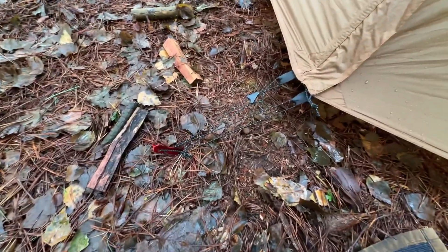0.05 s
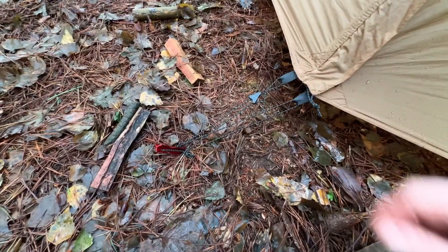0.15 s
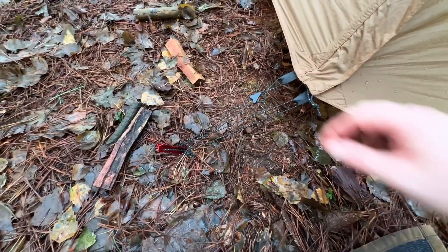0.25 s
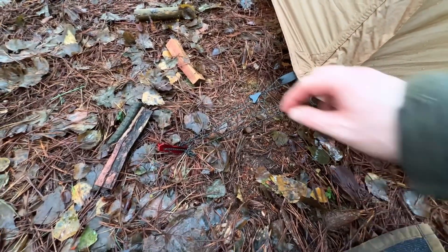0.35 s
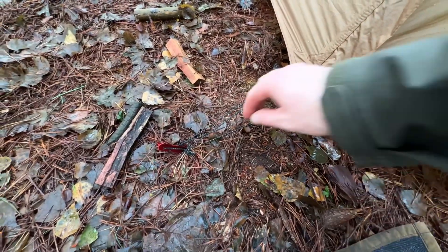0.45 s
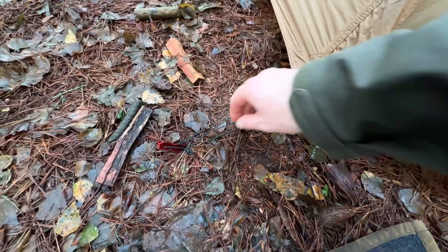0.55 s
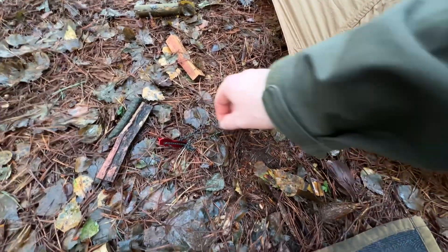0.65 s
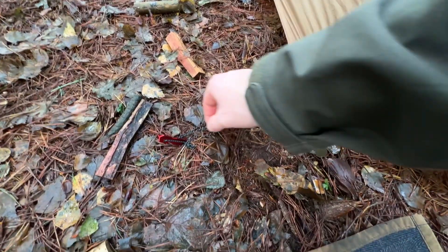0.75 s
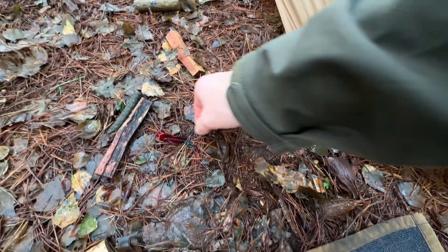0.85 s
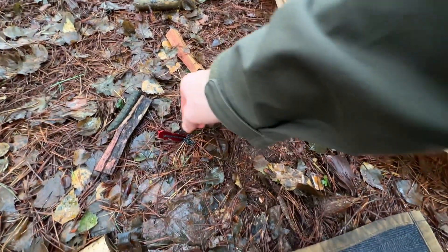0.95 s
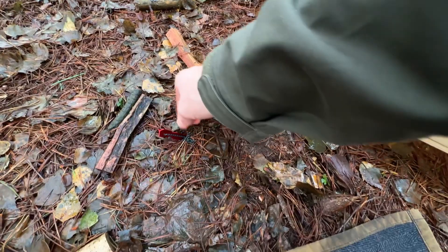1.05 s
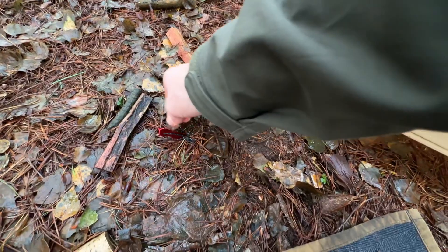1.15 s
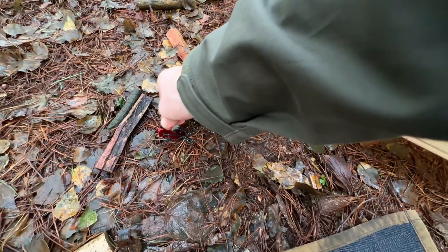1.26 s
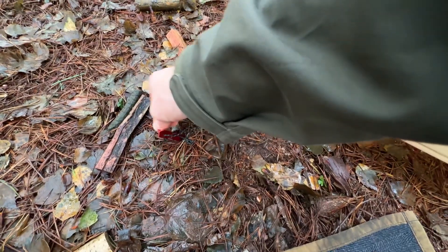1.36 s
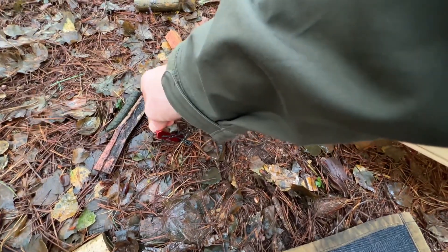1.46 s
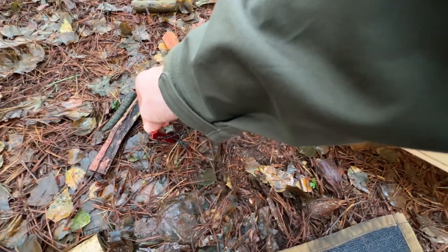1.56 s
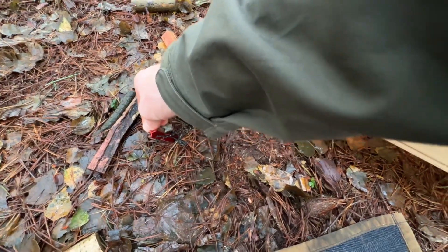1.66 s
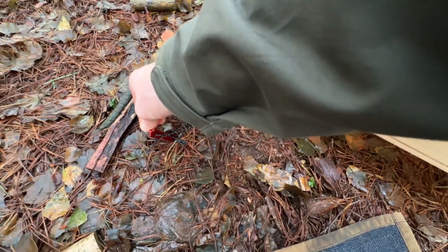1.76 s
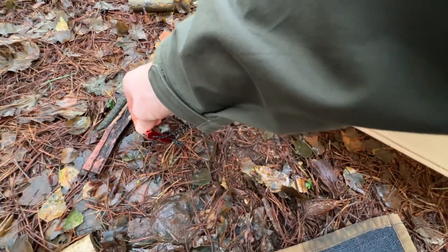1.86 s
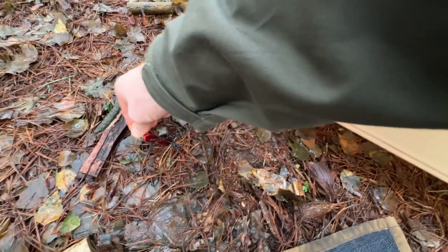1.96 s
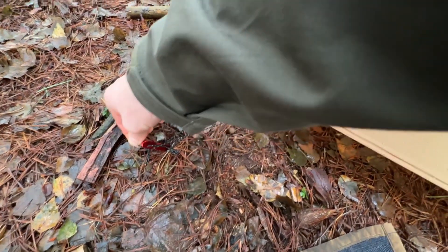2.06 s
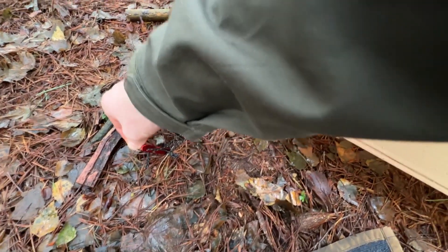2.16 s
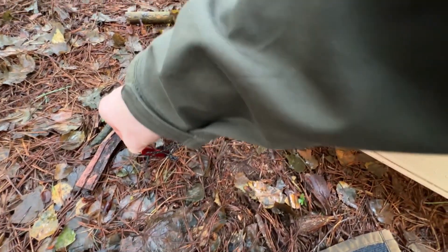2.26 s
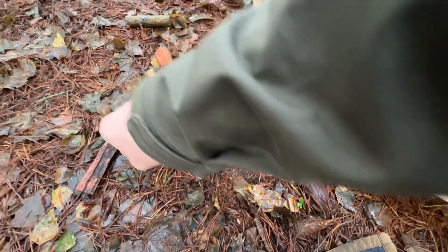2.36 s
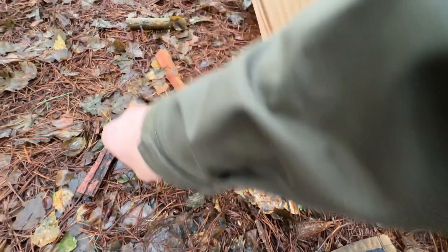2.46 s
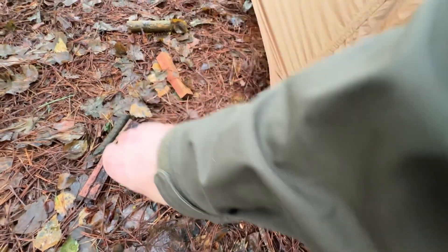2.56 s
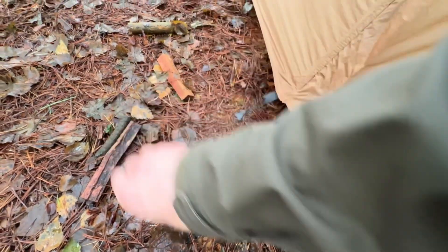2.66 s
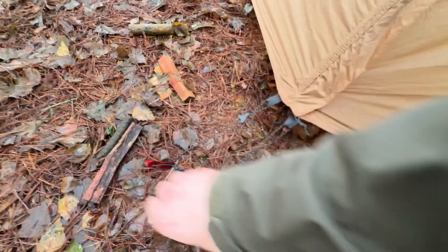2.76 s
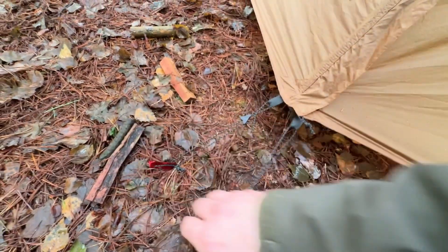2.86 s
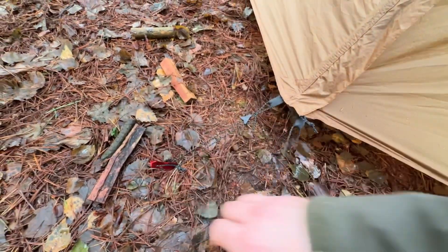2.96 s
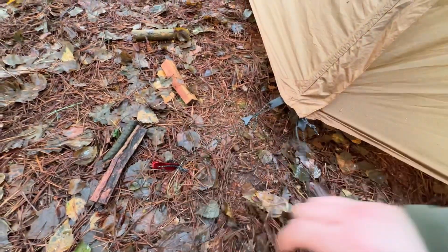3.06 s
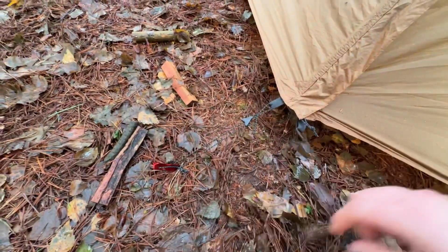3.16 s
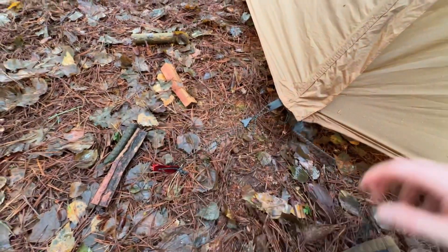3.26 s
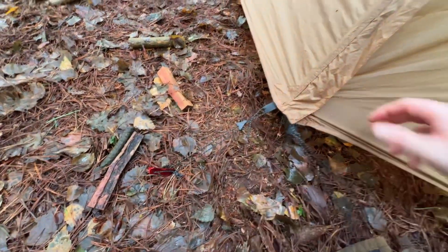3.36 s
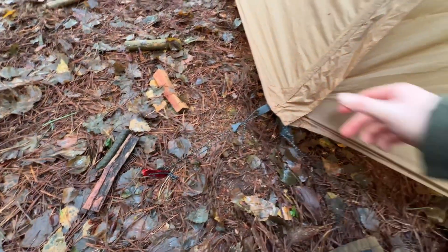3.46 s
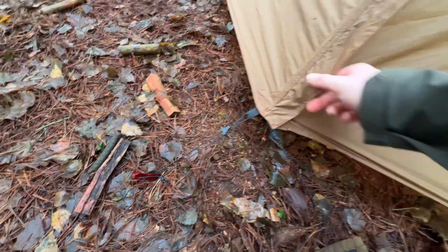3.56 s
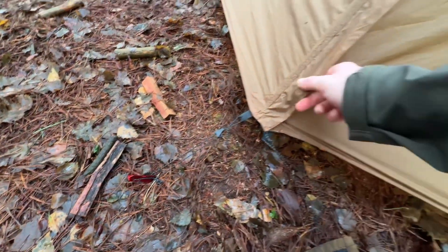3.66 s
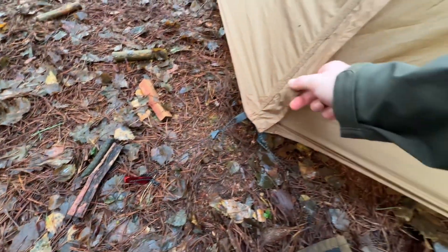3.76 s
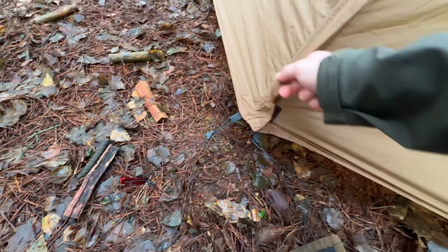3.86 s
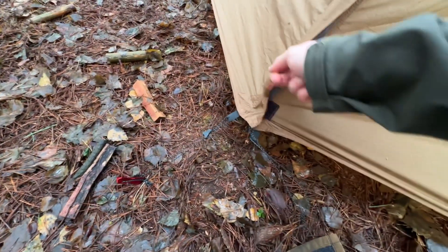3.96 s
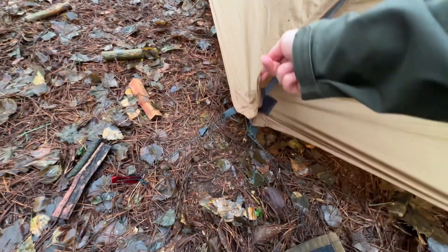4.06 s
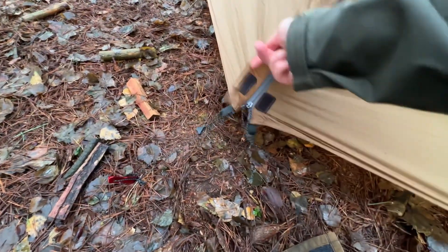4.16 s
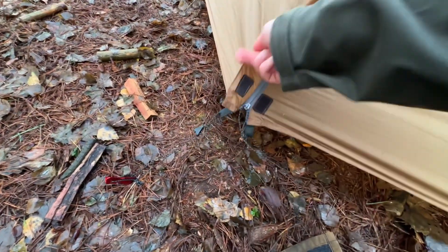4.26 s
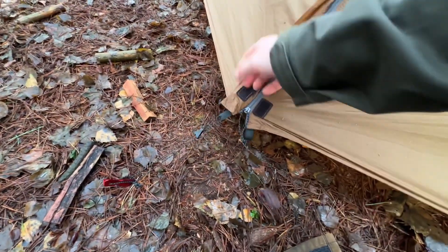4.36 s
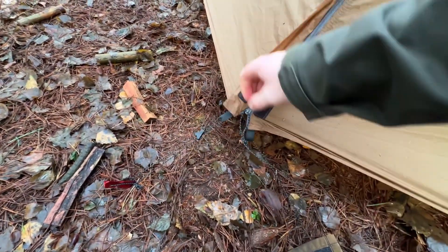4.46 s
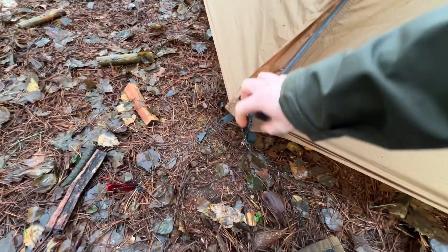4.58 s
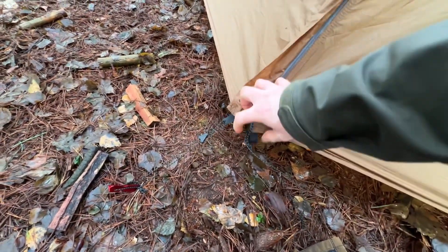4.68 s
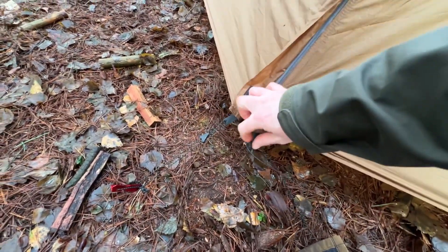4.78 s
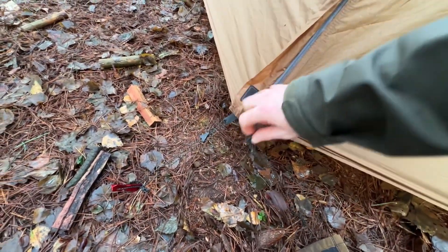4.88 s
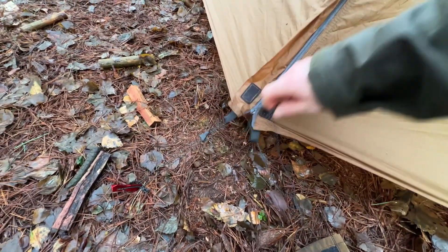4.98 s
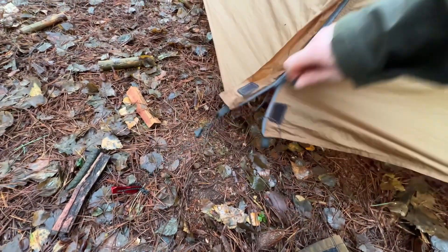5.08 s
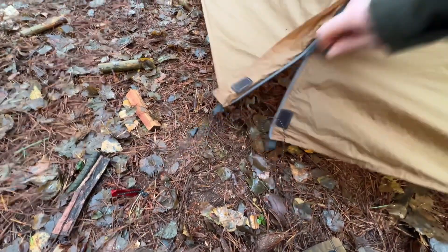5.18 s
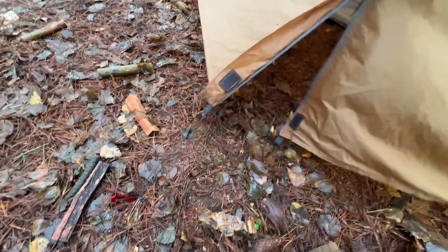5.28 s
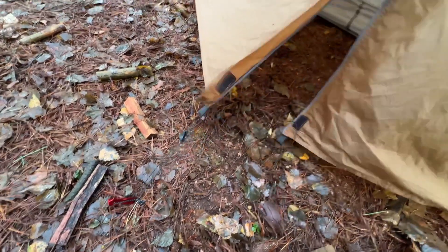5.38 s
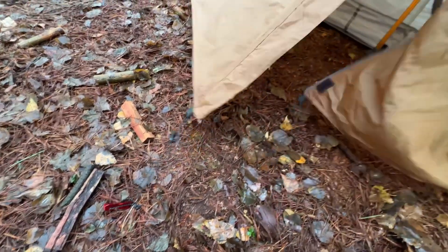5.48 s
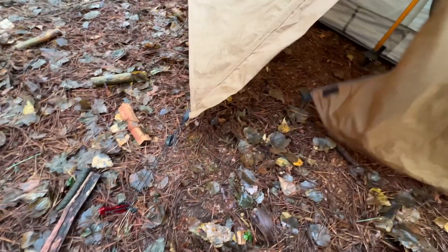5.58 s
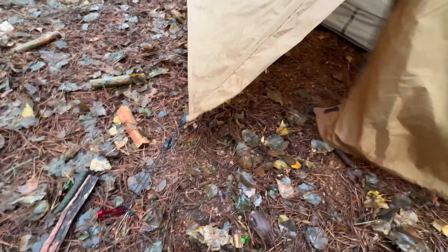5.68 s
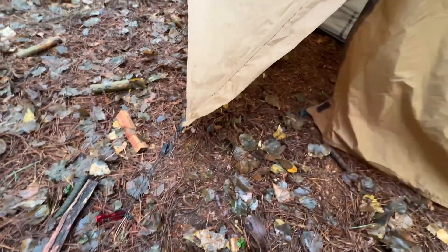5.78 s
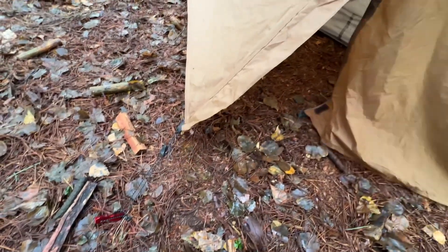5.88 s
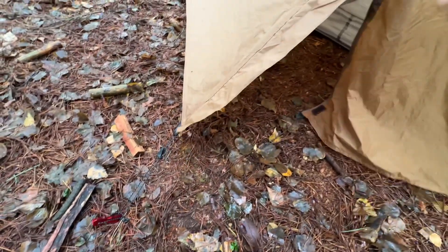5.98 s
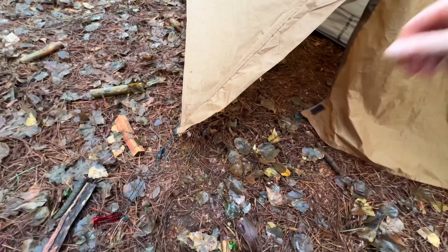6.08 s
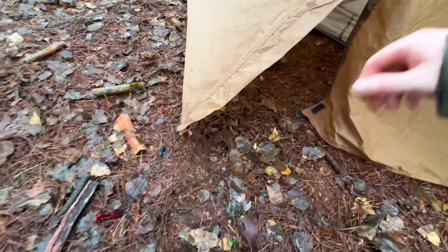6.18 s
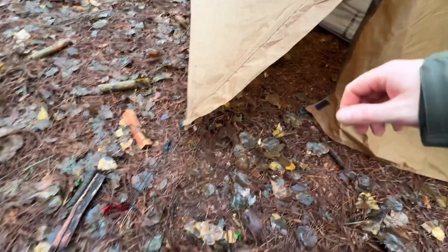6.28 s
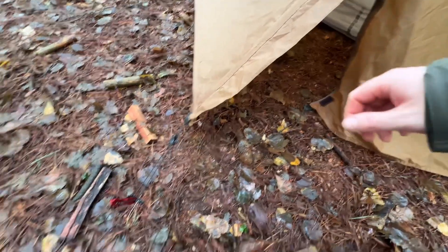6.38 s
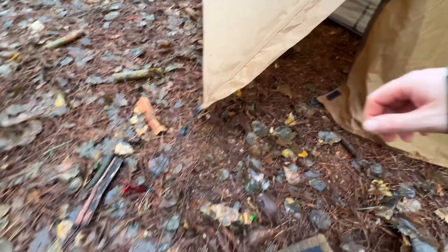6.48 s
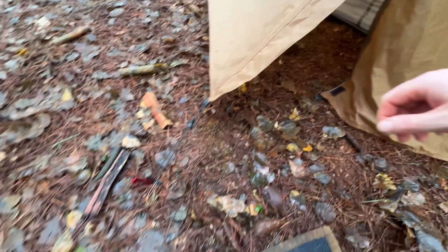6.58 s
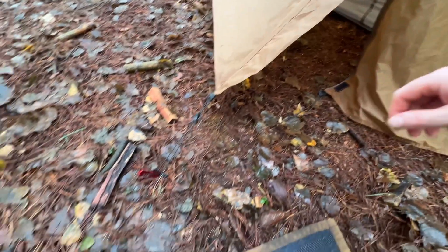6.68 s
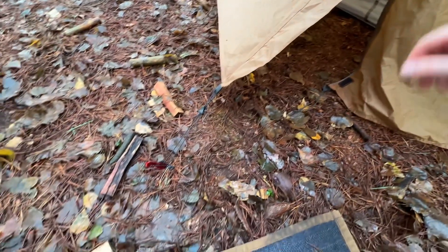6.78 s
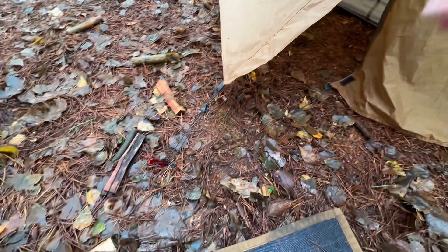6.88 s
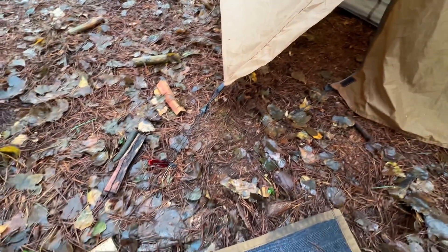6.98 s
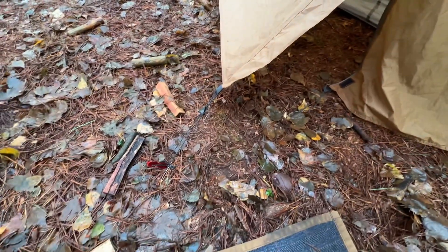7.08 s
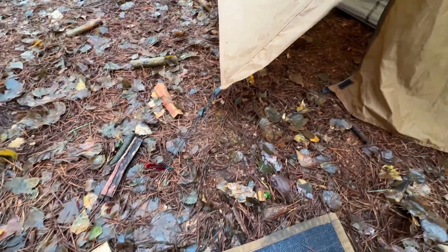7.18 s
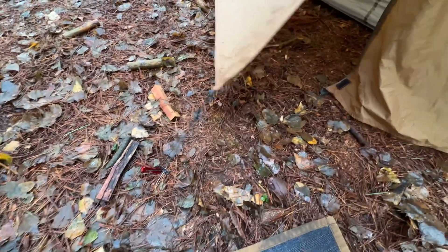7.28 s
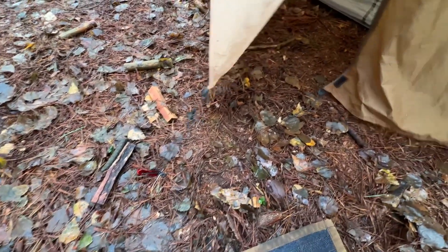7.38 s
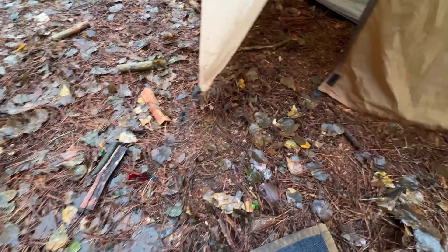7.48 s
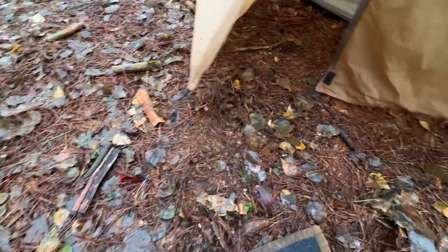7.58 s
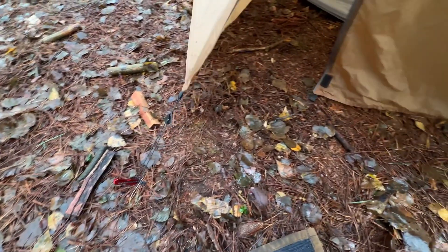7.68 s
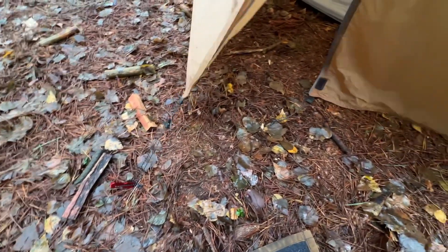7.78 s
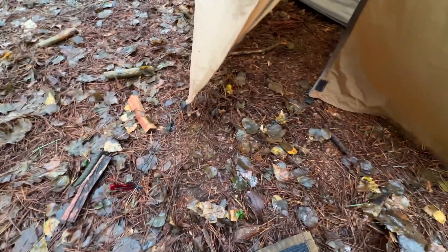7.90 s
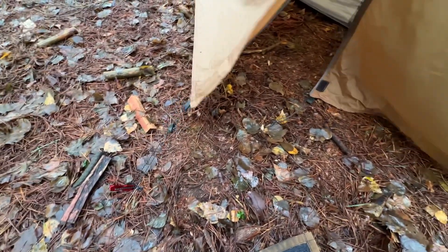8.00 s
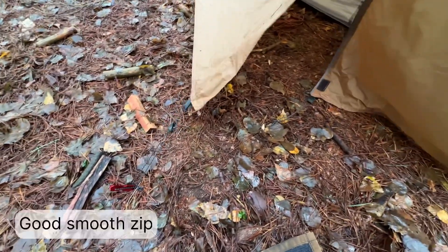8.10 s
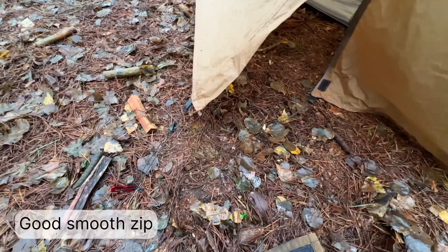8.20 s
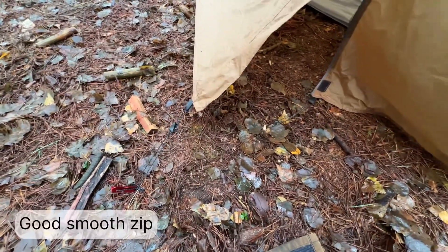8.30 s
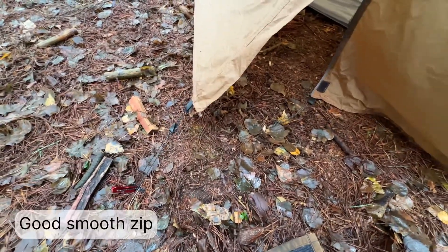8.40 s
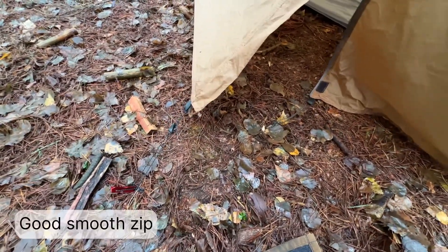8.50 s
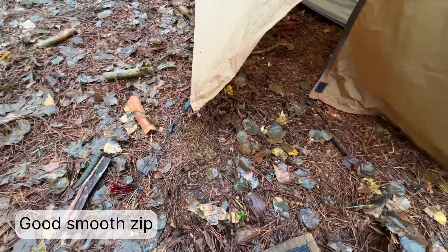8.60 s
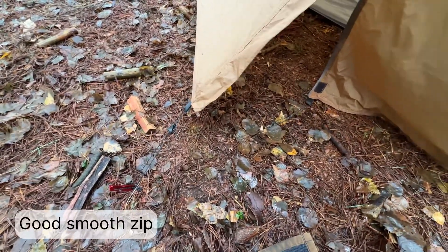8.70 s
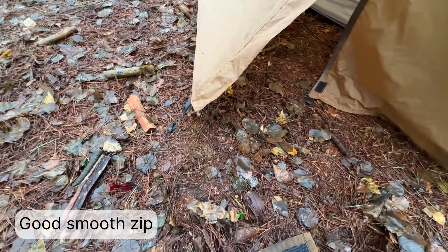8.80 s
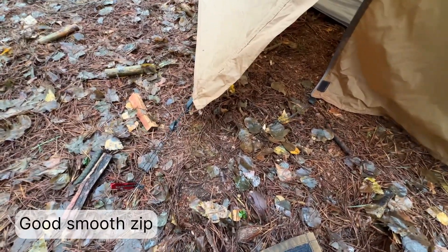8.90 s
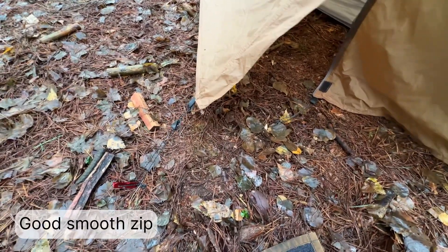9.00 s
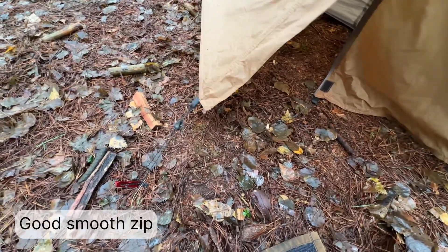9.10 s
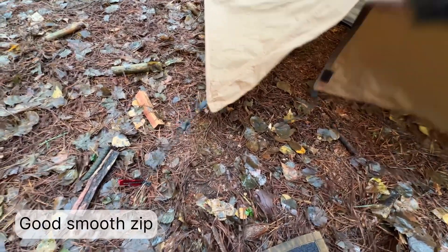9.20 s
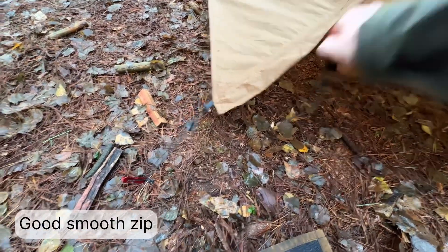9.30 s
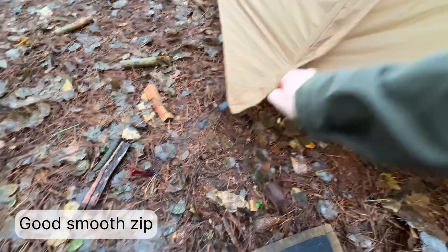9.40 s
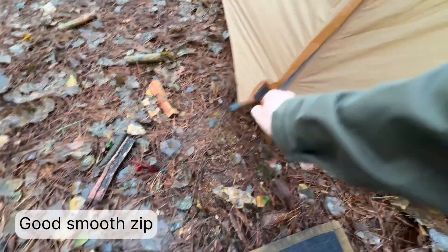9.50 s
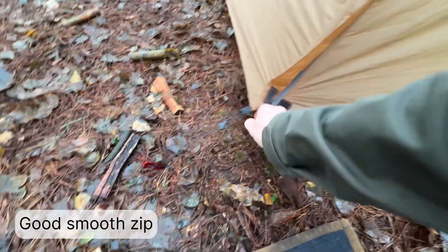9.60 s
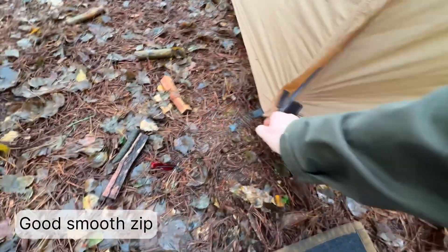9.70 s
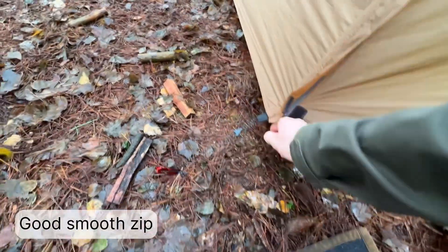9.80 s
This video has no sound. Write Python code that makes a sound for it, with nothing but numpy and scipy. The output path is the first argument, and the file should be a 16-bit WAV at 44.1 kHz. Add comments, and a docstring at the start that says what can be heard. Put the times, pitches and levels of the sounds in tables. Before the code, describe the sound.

Close by in a quiet forest, a taut nylon tent is plucked, fastener tabs snap open, and its door zips open fast, then later shut.

```python
"""A low forest wash, a far bird call and faint cloth come first; then a guy line plucks a taut nylon tent.
The hook-and-loop tabs of the door pop open hook by hook, each snap a sine sweeping down with noise.
The zipper is pulled open, later shut, in one stroke each: a whine at the tooth rate and scraping noise.
Sleeve and door flap rustle in between as swells of filtered noise with tiny ticks.
The bird's calls are short arched whistles; the forest is filtered noise."""
import sys
import numpy as np
from scipy import signal
from scipy.fft import rfft, irfft, next_fast_len
from scipy.io import wavfile
from scipy.ndimage import map_coordinates

SR = 44100
rng = np.random.default_rng(int(sys.argv[2]) if len(sys.argv) > 2 else 0)


def transcribe(signal):
    """Save signal, clipped to [-1, 1], as a 16-bit WAV file at the path in sys.argv[1]."""
    frames = np.atleast_2d(signal).T
    limited = np.clip(frames, -1, 1)
    pcm = np.round(limited * 32767).astype(np.int16)
    wavfile.write(sys.argv[1], SR, pcm)


N = 434385


def guy_line():
    """The guy line slips and catches on its peg, and every jerk plucks the taut fabric."""
    # Catches: start_s, crack_db, ring_hz, treble_db (over the crack), t60_s,
    # thump_db (over the crack, before the loss for high rings)
    catches = [(1.198, -46, 1180, -9, 0.0053, -12), (1.352, -30.5, 1030, -9, 0.008, 12),
               (1.471, -47.5, 2350, -11, 0.011, 0), (1.517, -50.5, 1790, -14, 0.0087, -8),
               (1.699, -55.5, 4000, -8, .014, -4), (2.2607, -26, 1100, -10.5, 0.0074, 8),
               (2.294, -48, 720, -6, 0.022, -2), (2.615, -43, 720, -15, 0.026, 4),
               (2.6245, -26, 1090, -12, 0.069, 7.5), (2.629, -17.5, 1280, -28, 0.046, -5)]
    # Spectrum of the crack: pitch_hz, level_db (per Hz)
    line_spectrum = [(120, -19), (450, -6), (800, 0.5), (1200, -5), (2000, -5), (3300, -9), (5200, -8.5),
                     (7000, -15), (12000, -76)]
    return snaps(catches, line_spectrum, turns=1.588, ring=0.66, ring_t60=0.022,
                 grit=0.54, tail_db=-19, tail_t60=0.1, flap=0.051)


def door_tabs(t60, thump_db, treble_db, follow_s, weaker_db, count):
    """Hooks let go one by one: each listed one takes a much weaker one along, and small ones make a rip.
    treble_db is the brightness of the weak and small hooks, count the number of small ones."""
    # Hooks that let go: start_s, crack_db, ring_hz, treble_db (over the crack)
    hooks = [(3.7808, -21.5, 1630, -15), (3.8834, -36.5, 990, -4), (3.887, -15.5, 940, -14.5),
             (3.8912, -19.5, 980, -11), (3.916, -36, 1800, -12), (3.965, -42, 2070, -5),
             (3.977, -19.5, 1410, -10.5), (3.9968, -19, 1080, -8), (4.0005, -20.5, 1130, -5.5),
             (4.0216, -30.5, 2500, -11), (4.1047, -9, 1385, -10), (4.109, -19.5, 1420, -13.5),
             (4.152, -24, 1100, -9.5), (7.2805, -26.5, 2890, -11.5), (7.2824, -25.5, 2220, -22),
             (7.303, -36.5, 2200, -8), (7.326, -42, 2680, -9), (7.348, -31, 3340, -7.5),
             (7.3773, -34, 2060, -11), (7.411, -32, 3500, -4), (7.452, -29.5, 2550, -6.5),
             (7.463, -24, 1950, -2.5), (7.4666, -21, 1900, -14), (7.486, -26.5, 3800, -5),
             (7.49, -20, 630, -11), (7.4946, -23.5, 1850, -7), (7.5063, -20.5, 1900, -9),
             (7.51, -25, 1100, -8), (7.517, -27, 2590, -6), (7.5234, -29, 700, -14),
             (7.557, -44, 1850, -18), (7.594, -46.5, 2200, -19), (7.632, -42.5, 1980, -13.5)]
    # Spectrum of the crack: pitch_hz, level_db (per Hz)
    hook_spectrum = [(200, -17.5), (600, -0.5), (1300, -2.5), (2200, -1), (3300, 0), (4200, -3.5),
                     (5200, -5.5), (7000, -29), (12000, -46)]
    delays = follow_s * rng.random(len(hooks))
    weak = [(s + delay, db - weaker_db, hz, treble_db)
            for (s, db, hz, _), delay in zip(hooks, delays)]

    # The second tab rips free in a dense run; its rings lie within half an octave of the middle
    rip_start_s, rip_length_s, rip_db, rip_middle_hz = 7.466, .055, -33.5, 2180
    rip = []
    for k, (when, pitch) in enumerate(rng.random((count, 2))):
        start_s = rip_start_s + rip_length_s * (k + when) / count
        rip.append((start_s, rip_db, rip_middle_hz * 2 ** (pitch - .5), treble_db))
    return snaps(hooks + weak + rip, hook_spectrum, turns=1.69, ring=0.63, ring_t60=.015,
                 grit=1.0, tail_db=-21, tail_t60=0.059, flap=0.04, contact=(t60, thump_db))


def slider_clicks(t60, thump_db):
    """The pull tab clicks, the slider snags and hits its stop: longer, grittier knocks than the hooks."""
    # Knocks: start_s, crack_db, ring_hz, treble_db (over the crack)
    knocks = [(4.471, -36.5, 1630, -14), (4.623, -42, 3950, -6), (4.704, -39.5, 800, -10),
              (5.004, -25.5, 1400, -7.5), (5.01, -28.5, 1490, -11), (5.191, -28, 2440, -14),
              (5.381, -28.5, 1190, -1), (5.387, -25, 1976, -8), (5.392, -28.5, 2730, -10),
              (5.4293, -26, 3040, 2), (5.433, -26, 1842, -4.5), (5.452, -31, 2900, -4.5),
              (5.665, -43, 2880, -8), (8.623, -44, 2730, -7), (9.465, -32, 1750, -8),
              (9.4805, -27, 3560, -4.5), (9.503, -26, 1750, -25), (9.517, -28, 1650, -18),
              (9.527, -37, 1200, -16), (9.538, -31.5, 950, -17), (9.84, -43, 750, -13)]
    # Spectrum of the crack: pitch_hz, level_db (per Hz)
    knock_spectrum = [(200, -22), (600, -2.5), (1300, -1.5), (2200, -0.5), (3000, -4), (4200, -5.5),
                      (5200, -8), (7000, -28), (12000, -47)]
    return snaps(knocks, knock_spectrum, turns=1.662, ring=0.53, ring_t60=0.01,
                 grit=1.7, tail_db=-9, tail_t60=0.073, flap=.09, contact=(t60, thump_db))


def snaps(rows, spectrum, turns, ring, ring_t60, grit, tail_db, tail_t60, flap, contact=()):
    """Each snap sends a bending wave over the fabric: highs arrive first, so it sweeps down into a thump.
    contact = (t60 in s, thump dB over the crack), where all rows share them."""
    # Spectrum of the treble: pitch_hz, level_db (per Hz)
    treble_spectrum = [(3500, -34), (6000, 5), (9500, 2), (11500, -4), (15500, -4)]
    flutter_spectrum = [(35, -23.5), (80, 3.5), (300, -4.0), (900, -12.5), (3000, -47.5)]
    # A snap that rings higher moves a smaller patch of fabric, so it thumps less
    middle_ring_hz, thump_loss_db_per_octave = 1200, 8.5
    # The thump swells for longer after a long or a hard snap:
    # shortest swell, share of the crack's t60, time added at full scale
    swell_s, swell_share, hard_swell_s = 0.0029, .15, 0.012
    out, t = np.zeros(N), np.arange(SR // 8) / SR
    tail = amp(tail_db) * fade(t, tail_t60)  # the panel keeps shivering

    def burst(x):
        """Scales a short sound so that its energy spread over 5 ms has rms 1."""
        return x / np.sqrt(np.sum(x ** 2) / (SR / 200))

    def snap(db, ring_hz, treble_db, t60, thump_db):
        """One crack with its ring, treble and thump."""
        octaves = max(np.log2(ring_hz / middle_ring_hz), 0)
        swell = swell_s + swell_share * t60 + hard_swell_s * amp(db)
        crack_noise, treble_noise, flutter_noise = rng.standard_normal((3, len(t)))
        decay = fade(t, t60)

        own_turns = turns * rng.uniform(0.924, 1.049)
        sweep = np.sin(2 * np.pi * own_turns * np.log(1 + t / 0.000254))
        gritty = sweep * decay + crack_noise * (grit * decay + tail)
        crack = burst(seam(colour(gritty, spectrum)))
        onset = 1 - np.exp(-t / 0.00032)
        tone = burst(np.sin(2 * np.pi * ring_hz * t) * fade(t, ring_t60) * onset)
        treble = burst(colour(treble_noise * (decay + 0.87 * tail), treble_spectrum))

        flutter = unit(colour(flutter_noise, flutter_spectrum)) * fade(t, 0.18)
        arrival = (t / swell) ** 3 / (1 + (t / swell) ** 5.5)  # quick rise, slower fall
        thump = burst(sweep * arrival * fade(t, 0.14) + flap * flutter)
        thump_gain = amp(thump_db - thump_loss_db_per_octave * octaves)
        return amp(db) * (burst(crack + ring * tone) + amp(treble_db) * treble + thump_gain * thump)

    for s, *row in rows:
        add(out, s, snap(*row, *contact))
    return out


def zipper_opening():
    """The door is zipped open: a sudden, fast pull."""
    # Average speed of the slider: time_s, teeth_per_s
    open_speed = [(4.995, 750), (5.03, 386), (5.09, 460), (5.195, 663), (5.26, 890), (5.33, 980),
                  (5.368, 1001), (5.402, 140), (5.485, 87)]
    # Whine at 1, 2 and 3 times the tooth rate: level_db (at the easy pace), growth_db (per speed doubling)
    open_whine = [(-43, 3.5), (-44.5, 7), (-45.5, 14.5)]
    return zipper(open_speed, attack_s=0.0075, tighten_s=0.0075, release_s=0.018,
                  rasp_db=-37.0, hiss_db=-40.5, harmonics=open_whine,
                  unsteady=.018, overtone_db=2, grain_db=1.3, flicker_db=8.5)


def zipper_closing():
    """The door is zipped shut: a slower pull that starts and ends gradually."""
    # Average speed of the slider: time_s, teeth_per_s
    shut_speed = [(8.95, 260), (9.05, 358), (9.125, 610), (9.19, 678), (9.29, 675), (9.415, 495),
                  (9.565, 270), (9.61, 135), (9.68, 83)]
    # Whine at 1, 2 and 3 times the tooth rate: level_db (at the easy pace), growth_db (per speed doubling)
    shut_whine = [(-40.5, -2.5), (-44, 7), (-50.5, 6)]
    return zipper(shut_speed, attack_s=0.112, tighten_s=0.17, release_s=0.11,
                  rasp_db=-42.5, hiss_db=-45.5, harmonics=shut_whine,
                  unsteady=.015, overtone_db=0.0, grain_db=0.5, flicker_db=9)


def zipper(stroke, attack_s, tighten_s, release_s, rasp_db, hiss_db, harmonics, unsteady,
           overtone_db, grain_db, flicker_db):
    """The slider clicks over the coil: a whine at the tooth rate and a scrape at every tooth.
    The levels are those at the easy pace; a faster pull has a louder rasp and hiss."""
    # Spectra of the scrape, low and high part: pitch_hz, level_db (per Hz)
    rasp_spectrum = [(60, -50), (150, -1), (400, -5), (900, 4), (1500, 0.5), (2800, 1), (4000, -0.5),
                     (5500, -13), (9000, -43)]
    hiss_spectrum = [(2500, -35.5), (4500, -0.5), (7000, 0), (10000, -3.5), (11500, -11), (15500, -9)]
    easy_teeth_per_s = 500
    rasp_db_per_octave, hiss_db_per_octave = 2.5, 3.5  # growth per doubling of speed
    t, speed = np.arange(N) / SR, curves(stroke)[0]
    since_start, until_end = t - stroke[0][0], stroke[-1][0] - t
    pull = np.clip(since_start / attack_s, 0, 1) * np.clip(until_end / release_s, 0, 1)
    octaves = np.log2(speed / easy_teeth_per_s)
    teeth = np.cumsum(speed * (1 + unsteady * wobble(120))) / SR  # teeth passed so far

    tooth_sizes = amp(grain_db * rng.standard_normal(N // 20))  # no two teeth catch alike
    catch = 0.43 + np.exp(-(teeth % 1) / 0.31)  # strongest as each tooth is met
    scrape = unit(tooth_sizes[teeth.astype(int)] * catch * amp(1.74 * wobble(130)))
    rasp = unit(seam(colour(scrape * rng.standard_normal(N), rasp_spectrum)))
    hiss = unit(colour(scrape * rng.standard_normal(N), hiss_spectrum))

    def partial(k):
        """The moving slider shakes ever new parts of the panel, so each harmonic drops out on its own."""
        tone = np.sin(2 * np.pi * k * teeth + .5 * wobble(300))
        return unit(tone * amp(-flicker_db * abs(wobble(55))))

    taut = np.clip(since_start / tighten_s, 0, 1) ** 2  # the panel sings once the pull has tightened it
    whine = taut * sum(amp(db + growth * octaves) * partial(k)
                       for k, (db, growth) in enumerate(harmonics, 1))
    overtones = seam(sum(partial(k) / k for k in range(4, 12)))
    rasp_gain = amp(rasp_db + rasp_db_per_octave * octaves)
    hiss_gain = amp(hiss_db + hiss_db_per_octave * octaves)
    return pull * (rasp_gain * (rasp + amp(overtone_db) * overtones) + hiss_gain * hiss + whine)


def rubbing():
    """Strength of the cloth's swish and hiss: each movement swells and dies away, and their powers add."""
    # Movements of sleeve and door flap, levels before the rustle's own gain:
    # peak_s, swish_db, half_length_s, hiss_db (over the swish)
    movements = [(.3, -63, .2, -4.5), (0.796, -61, .3, -3), (1.221, -67.5, .15, -3), (2.24, -66, .25, -3),
                 (2.44, -58.5, .04, -3.5), (2.556, -57.5, 0.045, -4), (2.814, -54, .065, -3.5),
                 (2.971, -63.5, .11, -3), (3.186, -63, .07, 0), (3.389, -61, .07, 0), (3.511, -59, .05, -1),
                 (3.96, -58.5, 0.18, -4), (4.182, -49, .025, -5), (4.28, -41.5, .022, -6.5),
                 (4.341, -52.5, .08, -4.5), (4.547, -52, .06, -9), (4.745, -58.5, .035, -3.5),
                 (4.876, -50.5, .018, -7.5), (4.981, -56.5, 0.04, -3.5), (5.469, -49, 0.034, -3.5),
                 (5.596, -53.5, .11, -10), (5.966, -61, .085, -3), (6.824, -67, .11, -3),
                 (7.19, -66, .14, -5), (7.488, -54.5, .14, -4.5), (7.949, -57, .04, 3),
                 (8.059, -64, .07, -1), (8.274, -60, .035, 1), (8.632, -46.5, .03, 0),
                 (8.691, -52.5, .025, -3), (8.818, -66, .04, -2), (8.9, -58, .02, -7),
                 (8.98, -54.5, .02, -4), (9.85, -60, .04, -4.5)]
    rest_swish_db, rest_hiss_db = -74.5, -84  # between movements, before the same gain
    skew = .15  # a swell rises faster and falls slower by this share
    t = np.arange(0, N / SR, .002)
    s, db, half_s, bright_db = np.transpose(movements)[:, :, None]
    away = abs(t - s) / (half_s * (1 + skew * np.sign(t - s)))
    swells = amp(db) * np.exp(-away ** 1.5)

    def total(parts, rest_db):
        """Adds the powers and gives one strength per sample."""
        strength = np.sqrt(np.sum(parts ** 2, axis=0) + amp(rest_db) ** 2)
        return np.interp(np.arange(N) / SR, t, strength)

    return total(swells, rest_swish_db), total(swells * amp(bright_db), rest_hiss_db)


def rustle(swish_gain, hiss_gain, grain_db, swish_db, hiss_db):
    """Nylon rubs on nylon: a soft swish with tiny crinkles in it."""
    # Spectra of the low and the high part: pitch_hz, level_db (per Hz)
    swish_spectrum = [(300, -15), (1300, 3.5), (2200, -0.5), (3500, 1), (5500, -6), (9000, -28.5)]
    cloth_spectrum = [(3000, -21.5), (6000, 1), (9800, 2), (11300, -9), (15500, -8.5)]
    crinkle = unit(amp(grain_db * wobble(500) + 1.6 * wobble(35)))
    swish = unit(colour(crinkle * rng.standard_normal(N), swish_spectrum))
    hiss = unit(colour(crinkle * rng.standard_normal(N), cloth_spectrum))
    return amp(swish_db) * swish_gain * swish + amp(hiss_db) * hiss_gain * hiss


def creases(rub, db, spread_db, count):
    """Creases flip over with tiny ticks, more often and louder the harder the cloth rubs."""
    out, t = np.zeros(N), np.arange(SR // 50) / SR
    travel = np.cumsum(np.sqrt(rub))
    for when, pitch, size in rng.random((count, 3)):
        at = np.searchsorted(travel, when * travel[-1])  # harder rubbing covers more travel
        hz = 2200 * 4.5 ** pitch
        noise = rng.standard_normal(len(t)) * fade(t, .01)
        tick = colour(noise, [(hz / 3, -16), (hz, 0), (hz * 2, -12)])
        add(out, at / SR, rub[at] * amp(db - spread_db * size) * unit(tick))
    return out


def bird(length, echo_db):
    """A far bird's short arched whistles, smeared by the trees."""
    # Thin calls: start_s, pitch_hz (near the top of the arch), level_db (without the echo)
    calls = [(.105, 8720, -62), (.77, 7750, -60), (6.44, 7160, -72), (6.69, 7350, -65), (6.86, 8000, -66),
             (6.89, 7200, -69), (8.46, 7450, -68)]
    out, t = np.zeros(N), np.arange(SR // 4) / SR
    arch = np.sin(np.pi * np.minimum(t / length, 1))  # rises and falls within length seconds
    for s, hz, db in calls:
        call = arch * np.sin(2 * np.pi * np.cumsum(hz * (.97 + 0.0353 * arch)) / SR)
        trees = rng.standard_normal(len(t)) * fade(t, .3)
        echo = signal.fftconvolve(call, trees / np.linalg.norm(trees))[:len(t)]
        add(out, s, amp(db) * (call + amp(echo_db) * echo))
    return out


def forest(level_db):
    """Distant air in the treetops: a low wash of noise whose level drifts slightly."""
    # Spectrum of the air: pitch_hz, level_db (per Hz)
    air_spectrum = [(26, -47.5), (45, -9), (87, 0), (129, -4), (165, -3), (234, -7.5), (624, -11),
                    (838, -10.5), (2300, -21), (3240, -31.5), (5700, -36.5), (10000, -42), (12000, -67.5),
                    (16000, -74)]
    # Course of the level, before level_db is added: time_s, level_db
    air_levels = [(0, -48), (1.2, -48.5), (2, -50), (5.7, -49), (6.6, -50.5), (8, -49), (9.85, -49)]
    air = unit(colour(rng.standard_normal(N), air_spectrum))
    return amp(curves(air_levels)[0] + level_db + 0.4 * wobble(5)) * air


def seam(x):
    """The direct sound plus the brief ringing of the door seam."""
    # Resonances of the seam with its zip tape: pitch_hz, width_hz, level_db
    resonances = [(1478, 84, -2), (1836, 90, -9.5), (2560, 96, -6), (3320, 120, -5), (5080, 180, -6.5)]
    size = next_fast_len(len(x) + 2048)
    f = np.fft.rfftfreq(size, 1 / SR)
    body = 1 + sum(amp(db) * 1j * f * width / (hz * hz - f * f + 1j * f * width)
                   for hz, width, db in resonances)
    return irfft(rfft(x, size) * body)[:len(x)]


def bounced(x):
    """The direct sound with its weak, thin and bright copies from nearby surfaces."""
    # Bounces off the ground and the facing panels: delay_s, level_db (before the thinning)
    bounces = [(.0023, -23), (.0046, -15), (.0079, -12)]
    out = x.copy()
    thin = colour(x, [(3000, -10.5), (15000, 1)])
    for delay, db in bounces:
        add(out, delay, amp(db) * thin)
    return out


def amp(db):
    """Decibels to gain."""
    return 10 ** (np.asarray(db) / 20)


def unit(x):
    """Scaled to rms 1."""
    return x / np.sqrt(np.mean(x ** 2) + 1e-20)


def curves(rows):
    """One value per sample for each column after the time."""
    s, *cols = np.transpose(rows)
    return [np.interp(np.arange(N) / SR, s, c) for c in cols]


def wobble(rate):
    """A smooth random curve, rate knots a second."""
    knots = rng.standard_normal(int(N * rate / SR) + 4)
    return map_coordinates(knots, [np.arange(N) * rate / SR], order=2)


def colour(x, points):
    """Filter with the gain of the (Hz, dB) points that never sounds ahead of its input."""
    size = 2 * next_fast_len(len(x) // 2 + 2048)
    hz, db = np.transpose(points)
    gain = amp(np.interp(np.log(np.fft.rfftfreq(size, 1 / SR) + 1), np.log(hz), db))
    # Folding the cepstrum forward in time gives the filter its minimum phase
    fold = np.r_[1, np.full(size // 2 - 1, 2), np.zeros(size // 2)]
    cepstrum = irfft(np.log(gain)) * fold
    return irfft(rfft(x, size) * np.exp(rfft(cepstrum)))[:len(x)]


def add(track, s, sound):
    """Mixes a sound in at s seconds."""
    part = track[max(round(s * SR), 0):][:len(sound)]
    part += sound[:len(part)]


def fade(t, t60):
    """Exponential decay, 60 dB down after t60."""
    return np.exp(-np.log(1000) * t / t60)


def scene():
    """The tent is close by and in the open, so almost dry; bird and forest lie behind it."""
    line = guy_line()
    tabs = door_tabs(t60=.013, thump_db=-10.0, treble_db=-3.5, follow_s=.045, weaker_db=27.5, count=7)
    slider = slider_clicks(t60=0.021, thump_db=-5.5)
    zips = zipper_opening() + zipper_closing()
    swish, hiss = rubbing()
    cloth = rustle(swish, hiss, grain_db=2.5, swish_db=3.0, hiss_db=2)
    cloth += creases(hiss, db=-1.0, spread_db=15, count=90)
    outdoors = bird(length=.035, echo_db=-5) + forest(level_db=-1.08)
    return (line + tabs + slider + bounced(zips + cloth) + outdoors)[None]


def record(dry):
    """Cuts the deepest bass, rounds off the highest peaks and keeps nothing above the band limit."""
    top_hz = 15850
    size = next_fast_len(N + SR // 2)
    lean = signal.sosfilt(signal.butter(4, 46, "high", fs=SR, output="sos"), dry)
    rounded = lean / (1 + (lean / .85) ** 4) ** .25
    passed = np.fft.rfftfreq(size, 1 / SR) < top_hz
    return irfft(rfft(rounded, size) * passed, size)[:, :N]


dry = scene()
out = record(dry)
transcribe(out)
```